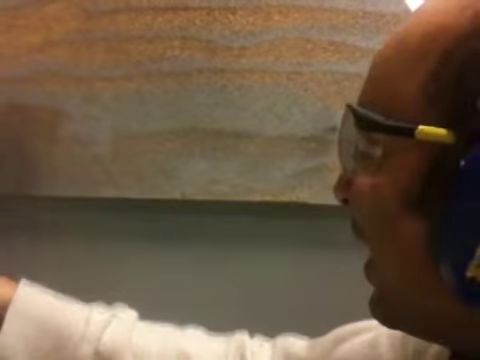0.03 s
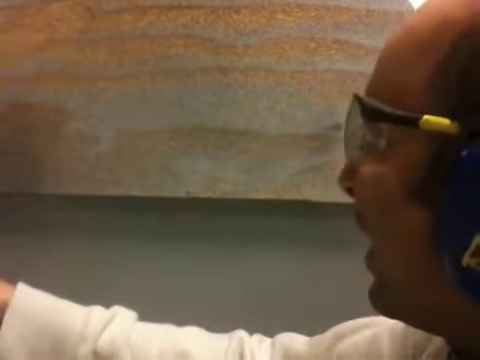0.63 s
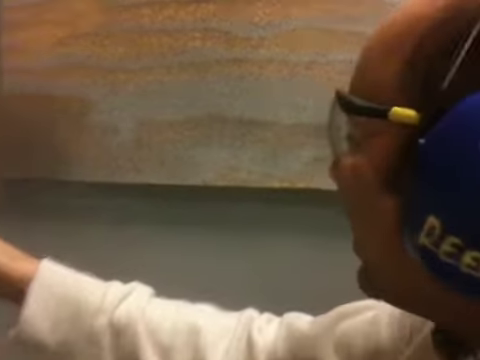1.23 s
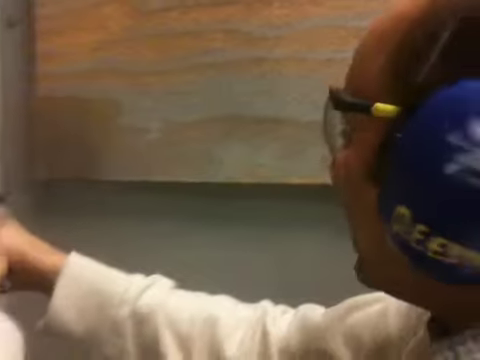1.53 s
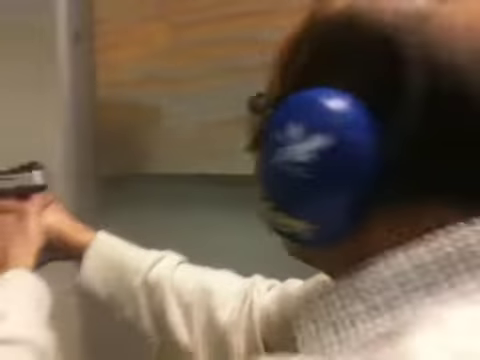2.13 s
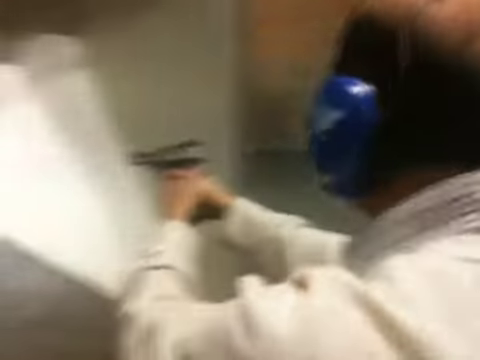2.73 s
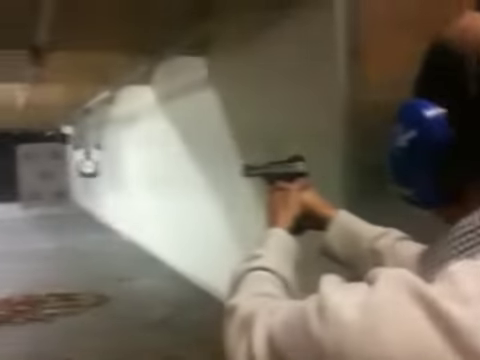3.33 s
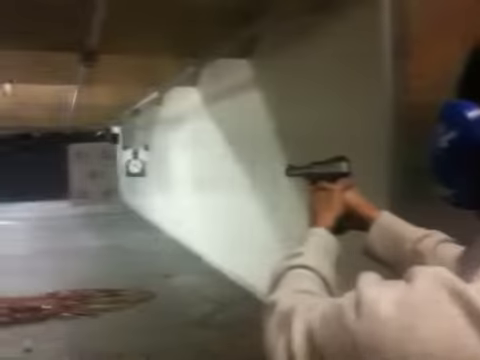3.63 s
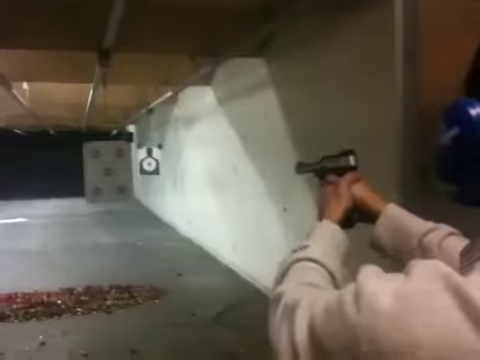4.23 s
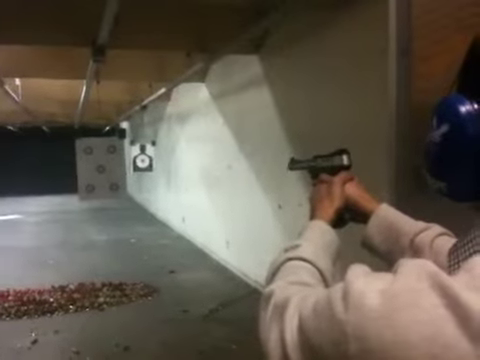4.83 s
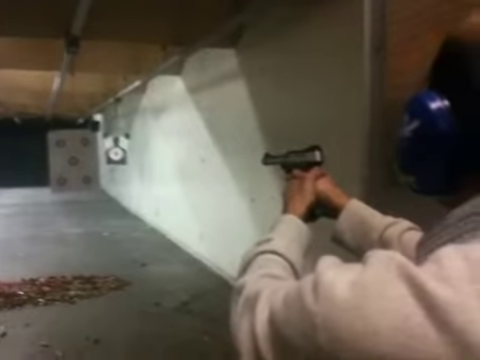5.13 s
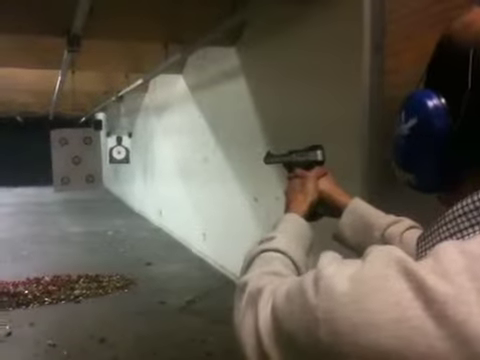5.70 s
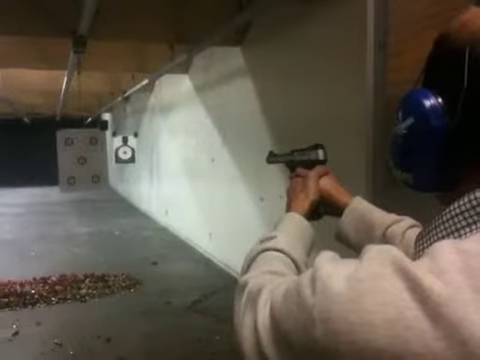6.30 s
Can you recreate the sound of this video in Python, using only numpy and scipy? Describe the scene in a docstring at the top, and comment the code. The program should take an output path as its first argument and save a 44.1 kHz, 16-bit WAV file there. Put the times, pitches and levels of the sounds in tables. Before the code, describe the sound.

Two loud handgun shots open in a concrete indoor range, their roar overloading a microphone just behind the shooter. As the echo dies, brass casings ping and roll on the floor and gear clacks over steady ventilation. After a pause, six more shots come at uneven intervals, one a dull thud behind a partition, another jolting the microphone. A harsh hissing rush swells up at the very end.

```python
"""Handgun shots in a concrete indoor range, heard just behind a shooter, over steady ventilation.
Two blasts open; their hall roar overloads the microphone, then dies away, treble first.
From 0.4 s brass casings ping and roll on the floor, and gear clacks.
From 2.6 to 5.8 s six more shots: one thuds dully behind a partition, one at 4.7 s jolts the microphone.
At 6.27 s a harsh, thin rush swells into overload."""
import sys
import numpy as np
from scipy import signal
from scipy.fft import rfft, irfft
from scipy.io import wavfile

SR = 44100
rng = np.random.default_rng(int(sys.argv[2]) if len(sys.argv) > 2 else 0)


def to_wav(sig):
    """Store sig (one row per channel, or 1-D mono) as 16-bit WAV at the path in sys.argv[1].

    Samples outside -1..1 are clipped; the rate is SR.
    """
    pcm = np.clip(np.atleast_2d(sig), -1, 1) * 32767
    pcm = np.round(pcm).astype(np.int16)
    wavfile.write(sys.argv[1], SR, pcm.T)  # frames by channels


N = 280476

# hall decay: freq_hz, t60_s
HALL_T60 = [(80, 1.1), (170, 1.18), (350, 0.96), (1000, 0.99), (2500, 0.93), (4500, 0.7), (7000, 0.58),
            (10000, 0.44), (16000, .3)]
# ventilation: freq_hz, density_db
AIR_SPECTRUM = [(25, 6.5), (60, 6.5), (135, 9), (200, -1), (330, -9.5), (440, -9), (1090, -15.5),
                (1400, -18.5), (2300, -22.5), (3200, -33.5), (6000, -34), (9000, -40.5), (15000, -58)]
# hollow duct note: centre_hz, width_hz, gain_db
DUCT_PEAKS = [(1080, 65, 6)]
# casings rolling on concrete: start_s, level_db, fade_db_per_s
CASING_ROLLS = [(1.68, -52.5, 58), (2.19, -66.5, 6)]
# bounces, harder is brighter: start_s, casing_kind, level_db, tilt_db_per_oct
CASING_BOUNCES = [(0.41, "plain", -49, 6), (0.617, "dull", -49, 20), (0.806, "bright", -37, 0),
                  (0.894, "bright", -39, 3), (0.995, "bright", -44, -4), (1.457, "dull", -49, -11),
                  (1.63, "thin", -49, 0), (1.78, "plain", -58, 0), (1.896, "dull", -48, 3),
                  (2.038, "plain", -52, -5), (2.09, "plain", -51, -14), (2.17, "plain", -53, 0),
                  (3.365, "plain", -48, 0), (3.97, "plain", -64, -20), (4.53, "plain", -51, 0),
                  (4.58, "plain", -50, 2), (5.13, "plain", -54, -3), (5.39, "plain", -44.5, 8)]
# brass modes by casing kind: low_hz, mid_hz, high_hz
MODE_HZ = {"bright": (6200, 11100, 15190), "plain": (6330, 10690, 11790), "dull": (5250, 7830, 11850),
           "thin": (8580, 11050, 13650)}
# mode levels by casing kind: low_db, mid_db, high_db
MODE_DB = {"bright": (0, -18, -10), "plain": (-5.5, 0, -14), "dull": (0, -8, -10), "thin": (0, -12, -14)}
# mode ring times: low_s, mid_s, high_s
MODE_T60_S = (.4, 0.43, 0.19)
# gear and brass clacks, plus two dull thuds of the muffled shot near 3.35-3.39 s:
# start_s, level_db, tilt_db_per_oct, rise_s
CLACKS_AND_THUDS = [(0.613, -37, 4.5, 0.0048), (0.795, -45.5, 5.5, 0.013), (0.901, -54, 7, 0.02),
                    (1.021, -41, -4, 0.022), (1.176, -45, -1, 0.027), (1.284, -50.5, 0.5, 0.022),
                    (1.454, -41.5, 4, 0.0058), (1.467, -41, 2, 0.033), (1.66, -46, 0.5, 0.037),
                    (1.839, -59, 10, 0.03), (2.2, -67, 13, .02), (3.348, -25, -19.5, .01),
                    (3.391, -27, -15, 0.0056), (5.365, -55, 12, 0.011), (5.686, -46.5, 1, 0.0041)]
# clack or thud before its tilt: freq_hz, density_db
BURST_SPECTRUM = [(200, -39), (900, -7), (1600, 9), (2800, -3), (4000, -6.5), (5400, -1), (7000, -4.5),
                  (10000, -18), (16000, -39)]
# rush: freq_hz, density_db
RUSH_SPECTRUM = [(300, -16), (1100, -7.5), (1900, -0.5), (2700, -7), (4000, -7), (6000, -8), (8500, -11),
                 (12000, -22), (16000, -28)]
# blast shoving the microphone housing: start_s, level_db, push_s
HOUSING_JOLT = (4.7205, -2, 0.0038)
# shots: start_s, level_db, tilt_db_per_oct, build_s, t60_factor, bark_db, pulse_db
GUNSHOTS = [(-0.11, 8, 0.9, 0.032, 1.2, 0, -9), (0.076, 8.5, 1.0, 0.0045, 1.02, 6.5, -12.5),
            (2.601, 11.5, 0.44, 0.067, 1.113, -1.5, -3), (3.354, -10, -5, 0.038, 1.3, 2, -23),
            (3.447, 13, 0, 0.0033, 1.08, 0.5, -5.5), (4.141, 8.5, 1.28, 0.001, 0.97, 2, -10.5),
            (4.676, 11.5, 0.5, 0.036, 1.104, -1, -14), (5.753, 14, 0.6, 0.018, 1.246, -1.5, 9.5)]
# blast as the hall returns it: freq_hz, density_db
ROAR_SPECTRUM = [(30, -9), (80, 4.5), (125, -5.5), (170, -0.5), (270, 0), (420, 0), (750, 0.5), (1200, 0.5),
                 (2000, -7), (2900, -12), (4200, -9.5), (6500, -12.5), (10000, -21.5), (16000, -30)]
# shooting booth resonances: centre_hz, width_hz, gain_db
BOOTH_PEAKS = [(278, 11, 0.5), (335, 40, 0), (652, 14, 2), (860, 600, 1.5), (1147, 45, -2.5),
               (3576, 27, 2.5)]
# pressure wave near the booth: freq_hz, density_db
BOOM_SPECTRUM = [(30, -8.5), (100, 3), (250, -9.5), (600, -10), (1500, -37), (6000, -72)]
# ringing steel baffles: freq_hz, density_db
BAFFLE_SPECTRUM = [(1200, -31), (2600, -2), (3600, -5), (4300, -5), (5200, -11.5), (7000, -28.5),
                   (12000, -51)]
# microphone port: freq_hz, gain_db
PORT_RESPONSE = [(300, 0), (1200, -1.5), (2500, -1.5), (4100, 2.5), (6500, 0.5), (16000, 4)]


def amp(db):
    """Decibels to gain."""
    return 10 ** (np.asarray(db) / 20)


def unit_rms(x):
    """Scales to rms 1."""
    return x / np.sqrt(np.mean(x ** 2) + 1e-20)


def curve_at(points, hz):
    """Interpolates (freq_hz, value) points over log frequency."""
    point_hz, value = np.transpose(points)
    return np.interp(np.log(hz + 1), np.log(point_hz + 1), value)


def add(mix, start_s, sound):
    """Mixes a sound in at start_s."""
    at = round(start_s * SR)
    sound = sound[max(-at, 0):]
    part = mix[max(at, 0):][:len(sound)]
    part += sound[:len(part)]


def noise(spectrum, size, tilt_db_per_oct=0, peaks=()):
    """Noise of rms 1 with a spectrum, a tilt above 200 Hz and resonant peaks."""
    hz = np.fft.rfftfreq(size, 1 / SR)
    db = curve_at(spectrum, hz) + tilt_db_per_oct * np.log2(np.maximum(hz, 200))
    for centre_hz, width_hz, gain_db in peaks:
        db = db + gain_db / (1 + (2 * (hz - centre_hz) / width_hz) ** 2)
    return unit_rms(irfft(rfft(rng.standard_normal(size)) * amp(db), size))


def flutter(size, change_s):
    """Random curve of rms 1, time scale change_s."""
    hz = np.fft.rfftfreq(size, 1 / SR)
    return unit_rms(irfft(rfft(rng.standard_normal(size)) / (1 + (hz * change_s) ** 2), size))


def decay(t, t60_s):
    """Falls 60 dB in t60_s."""
    return np.exp(-np.log(1000) * t / t60_s)


def hall_decay(x, t60_factor=1):
    """Each band fades at the hall's rate, treble first."""
    hz, t, bands = signal.stft(x, SR, nperseg=512)
    fade = decay(t, t60_factor * curve_at(HALL_T60, hz)[:, None])
    return signal.istft(bands * fade, SR, nperseg=512)[1][:len(x)]


def ventilation(level_db=-37):
    """Steady air noise with a hollow duct note."""
    return amp(level_db) * noise(AIR_SPECTRUM, N, peaks=DUCT_PEAKS)


def casing_rolls(pitch_hz=5310, sag_hz_per_s=680, rise_s=0.008, grain_s=0.0027):
    """Grit keeps rolling brass ringing; the fuzzy tone fades and sinks as it slows."""
    envelope, t = np.zeros(N), np.arange(SR) / SR
    for start_s, level_db, fade_db_per_s in CASING_ROLLS:
        add(envelope, start_s, amp(level_db - fade_db_per_s * t) * (1 - np.exp(-t / rise_s)))
    since_first_s = np.arange(N) / SR - CASING_ROLLS[0][0]
    hz = pitch_hz - sag_hz_per_s * since_first_s
    grit = flutter(N, grain_s) + 1j * flutter(N, grain_s)
    ring = grit * np.exp(2j * np.pi * np.cumsum(hz) / SR)
    return ring.real * envelope


def casing_pings(rise_s=0.0042, shimmer_depth=0.6, shimmer_s=0.01, tumble_hz=28):
    """Brass tubes ring in three modes per bounce; tumbling and echoes make them shimmer."""
    out, t = np.zeros(N), np.arange(SR // 2) / SR
    attack = 1 - np.exp(-t / rise_s)
    for start_s, kind, level_db, tilt_db_per_oct in CASING_BOUNCES:
        spin_hz = tumble_hz * 2 ** (rng.random() - 0.5)
        tumble = (3 + np.cos(2 * np.pi * spin_hz * t)) / 7
        for hz, mode_db, t60_s in zip(MODE_HZ[kind], MODE_DB[kind], MODE_T60_S):
            octaves = np.log2(hz / np.median(MODE_HZ[kind]))
            gain = amp(level_db + mode_db + tilt_db_per_oct * octaves)
            shimmer = 1 + shimmer_depth * (flutter(len(t), shimmer_s) + 1j * flutter(len(t), shimmer_s))
            ring = (shimmer * np.exp(2j * np.pi * hz * t)).imag * decay(t, t60_s)
            add(out, start_s, gain * tumble * ring * attack)
    return out


def clacks_and_thuds(echo_db=-9, rattle_db=3, rattle_s=0.001):
    """Rattling clacks of gear and brass, and two thuds of the muffled shot; each with a hall echo."""
    out, t = np.zeros(N), np.arange(SR) / SR
    for start_s, level_db, tilt_db_per_oct, rise_s in CLACKS_AND_THUDS:
        burst = noise(BURST_SPECTRUM, SR, tilt_db_per_oct) * t / rise_s * np.exp(1 - t / rise_s)
        rattle = amp(rattle_db * flutter(SR, rattle_s))
        echo = hall_decay(noise(BURST_SPECTRUM, SR, tilt_db_per_oct)) * (1 - np.exp(-t / rise_s))
        add(out, start_s, amp(level_db) * (burst * rattle + amp(echo_db) * echo))
    return out


def rush(start_s=6.268, full_db=-6, swell_db=39, swell_s=0.023):
    """Bright, hissing roar; climbs fast, then levels off."""
    t = np.arange(N) / SR - start_s
    level_db = full_db - swell_db * np.exp(-np.maximum(t, 0) / swell_s)
    return noise(RUSH_SPECTRUM, N) * (t > 0) * amp(level_db)


def jolt():
    """A blast pushes and pulls the microphone housing once."""
    out, t = np.zeros(N), np.arange(SR // 10) / SR
    start_s, level_db, push_s = HOUSING_JOLT
    add(out, start_s, amp(level_db) * np.sin(np.pi * t / push_s) * np.exp(-(t / (2 * push_s)) ** 2))
    return out


def gunshots():
    """Muzzle pulse and boom, then clumped wall echoes merging into a roar; steel baffles ring on."""
    pulse_s, front_s, blunting_db_per_oct = 0.0004, 0.00036, 1.3
    boom_db, boom_s = -8, 0.06
    bark_hz, bark_width_hz = 2100, 1100
    clump_db, clump_floor_db, clump_s, merge_s = 1.5, 0.1, 0.0044, 0.2
    far_echo_db, far_echo_s, far_spread_s = 2, 0.26, 0.15
    baffle_db, baffle_t60_s = -37, 2.04
    out, t = np.zeros(N), np.arange(2 * SR) / SR
    for start_s, level_db, tilt_db_per_oct, build_s, t60_factor, bark_db, pulse_db in GUNSHOTS:
        peaks = BOOTH_PEAKS + [(bark_hz, bark_width_hz, bark_db)]
        roar = hall_decay(noise(ROAR_SPECTRUM, len(t), tilt_db_per_oct, peaks), t60_factor)
        far_echo = np.exp(-((t - far_echo_s) / far_spread_s) ** 2)  # from the end of the range
        swell = amp(far_echo_db * (far_echo - 0.5))
        clumps = amp((clump_floor_db + clump_db * np.exp(-t / merge_s)) * flutter(len(t), clump_s))
        pulse = amp(pulse_db) * (1 - t / pulse_s) * np.exp(-t / pulse_s)
        boom = amp(boom_db) * noise(BOOM_SPECTRUM, len(t)) * np.exp(-t / boom_s)
        baffles = amp(baffle_db) * noise(BAFFLE_SPECTRUM, len(t)) * decay(t, baffle_t60_s)
        build = 1 - 0.87 * np.exp(-t / build_s)
        hall = (roar * swell * clumps + baffles) * build
        # bending round partitions dulls a shot and blunts its front
        rise_s = front_s * 2 ** (-tilt_db_per_oct / blunting_db_per_oct)
        front = 1 - np.exp(-t / rise_s)
        add(out, start_s, amp(level_db) * front * (hall + boom - pulse))
    return out


def scene():
    """Airborne sound at one microphone, on both channels."""
    mono = ventilation() + gunshots() + rush() + clacks_and_thuds() + casing_pings() + casing_rolls()
    return np.array([mono, mono])


def overload(x, ceiling):
    """Hard clip, 2x oversampled."""
    oversampled = signal.resample_poly(x, 2, 1, axis=1)
    return signal.resample_poly(np.clip(oversampled, -ceiling, ceiling), 1, 2, axis=1)


def record(dry, capsule_ceiling=0.71, converter_ceiling=0.69, bass_cut_hz=180, treble_cut_hz=15850):
    """The capsule hits its stops, the bass cut sags the flat tops, the converter clips overshoot."""
    pinned = overload(dry, capsule_ceiling)
    bass_cut = signal.butter(4, bass_cut_hz, "high", fs=SR, output="sos")
    sagged = signal.sosfilt(bass_cut, pinned)
    port_gain = amp(curve_at(PORT_RESPONSE, np.fft.rfftfreq(N, 1 / SR)))
    coloured = irfft(rfft(sagged) * port_gain, N)
    clipped = overload(coloured + jolt(), converter_ceiling)
    treble_cut = signal.firwin(511, treble_cut_hz, window=("kaiser", 9), fs=SR)
    return signal.oaconvolve(clipped, treble_cut[None], "same")


dry = scene()
out = record(dry)
to_wav(out)
```